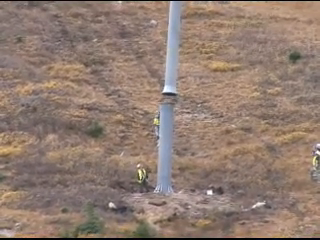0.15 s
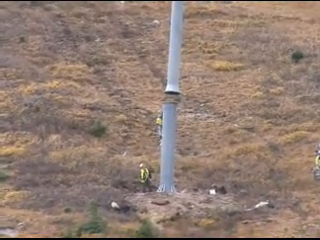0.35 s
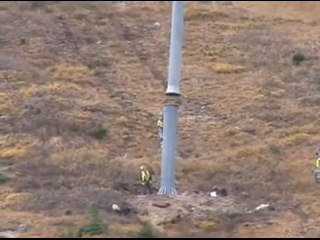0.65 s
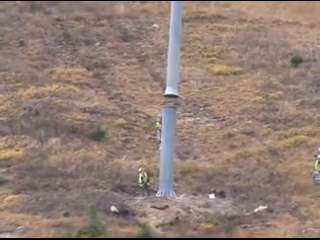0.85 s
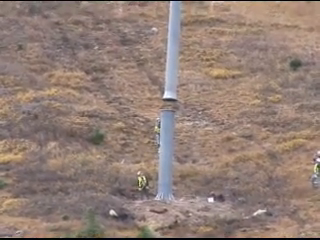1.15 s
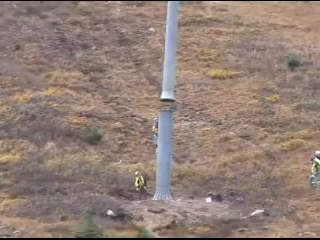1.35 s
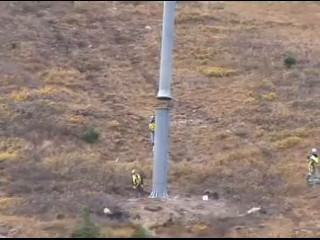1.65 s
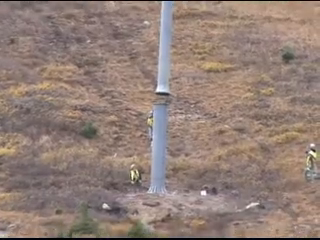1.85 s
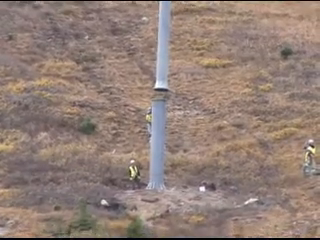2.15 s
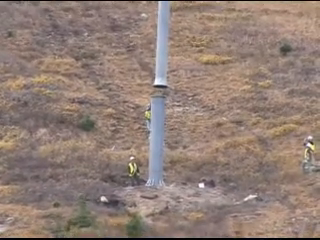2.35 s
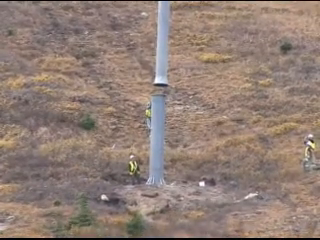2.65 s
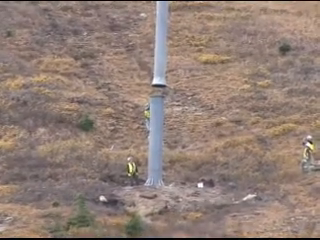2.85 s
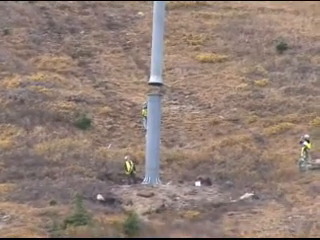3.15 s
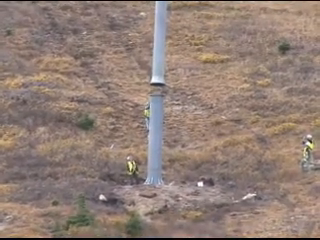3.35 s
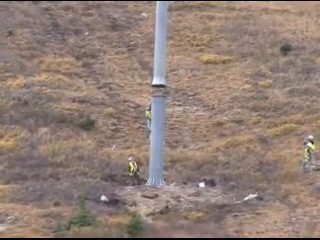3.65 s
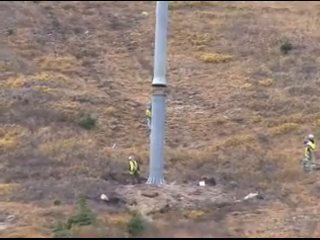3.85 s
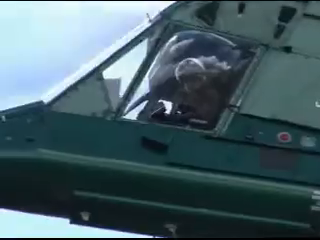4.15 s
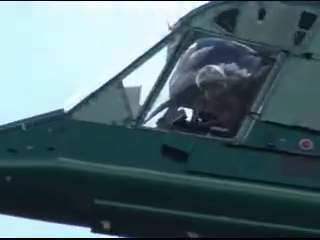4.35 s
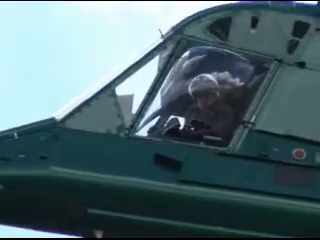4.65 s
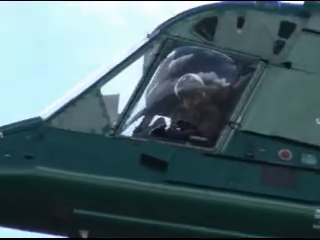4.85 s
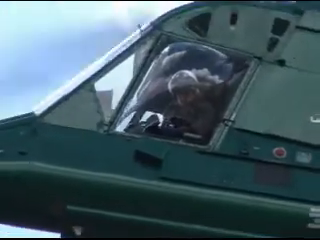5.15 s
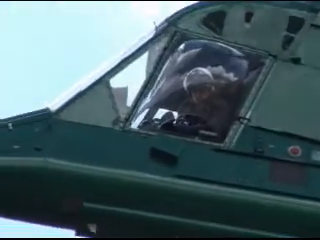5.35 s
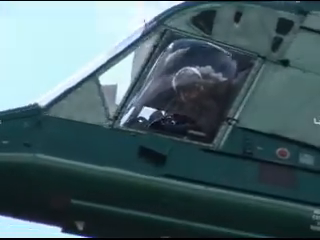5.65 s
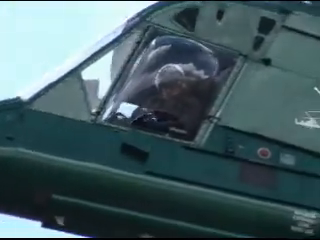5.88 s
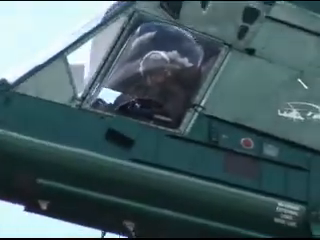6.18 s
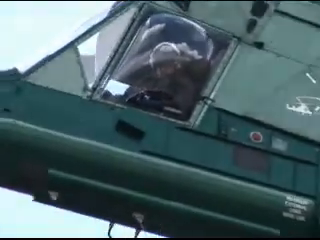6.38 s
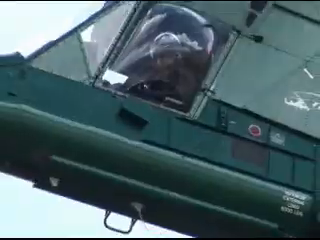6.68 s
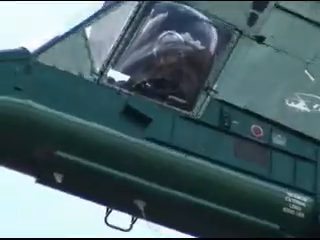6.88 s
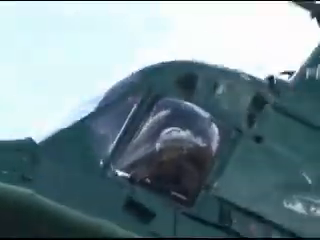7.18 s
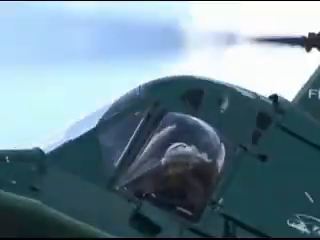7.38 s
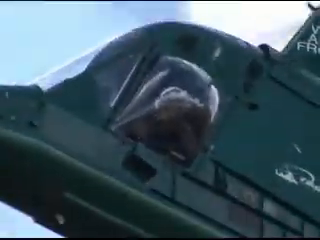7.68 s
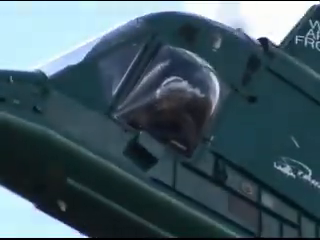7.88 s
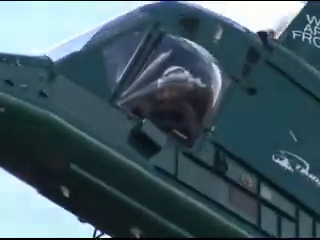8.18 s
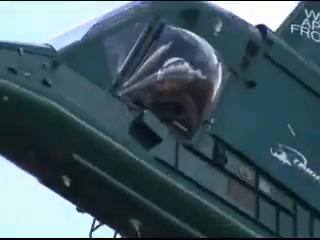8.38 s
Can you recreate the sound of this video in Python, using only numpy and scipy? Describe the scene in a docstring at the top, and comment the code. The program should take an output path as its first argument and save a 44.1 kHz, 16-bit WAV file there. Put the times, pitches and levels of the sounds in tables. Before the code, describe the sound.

Rapid chopping of a heavy hovering helicopter, deep and reverberant at a distance, cuts suddenly to a crisper, hissing close-up with whistling blades and singing gears.

```python
"""A hillside: a twin-rotor helicopter hovers with a load, heard from a distance, then abruptly from close by.
Behind it lie turbine hiss, gear and turbine whine, a drone and a throbbing boom, made of coloured noise and
wavering tones. Swish and downwash are noise that swells with the rotors. In front, blades slap about nine times
a second, as filtered pulses; from afar the second rotor and ground answer, and at both places the slope scatters."""
import sys
import numpy as np
from scipy import signal
from scipy.fft import rfft, irfft, next_fast_len
from scipy.io import wavfile
from scipy.ndimage import uniform_filter1d

SR = 44100
rng = np.random.default_rng(int(sys.argv[2]) if len(sys.argv) > 2 else 0)


def generate_wav(sig):
    """Save sig (samples, or channels by samples) to the path in sys.argv[1] as 16-bit PCM at SR."""
    pcm = np.round(np.clip(np.atleast_2d(sig).T, -1, 1) * 32767).astype(np.int16)
    wavfile.write(sys.argv[1], SR, pcm)


N = 375732
T = np.arange(N) / SR  # time of each sample [s]

CUT_S = 4.127  # the listening place moves from far to close [s]
TOP_HZ = 10400  # upper edge of the microphone chain [Hz]

# Levels below are relative, before later mixing and scaling, unless a line says otherwise.
# Spectra are filter responses: (frequency [Hz], level [dB])
# turbine hiss, far and close
FAR_HISS = [(150, -3), (700, -4), (1030, 0), (1260, 8.5), (1500, -3.5), (1780, 6), (2050, -1.5),
            (2400, 3.5), (3000, -3), (3900, -16.5), (4600, -30.5), (5050, -29), (5700, -58.5),
            (10000, -52.5)]
NEAR_HISS = [(150, 5), (850, -1.5), (1200, 2), (1480, -5), (1800, 2), (2700, -0.5), (4000, -9.5),
             (4620, -22.5), (5020, -14), (5500, -22.5), (5950, -21.5), (7500, -44), (8500, -23),
             (10200, -30.5)]
# rotor downwash, far and close
FAR_WASH = [(15, -28.5), (50, -9.5), (100, 0), (230, -2.5), (450, -3.5), (800, -8), (1050, -19),
            (1500, -26), (4000, -68)]
NEAR_WASH = [(15, -10), (50, -6.5), (85, 4.5), (125, -6.5), (165, -6.5), (205, 1.5), (260, -3.5), (400, -5),
             (700, -18.5), (3000, -63.5)]
# blade swish, close
NEAR_SWISH = [(1000, -33.5), (1900, -4), (2400, 5.5), (3000, 6), (4000, -3), (4620, -18), (5020, -9),
              (5500, -23), (6000, -24), (7500, -28.5), (8500, -42.5), (10200, -48)]
# narrow band of turbine roar, far
TURBINE_BAND = [(700, -51.5), (1150, -6), (1270, 2.5), (1360, -4.5), (1480, -32), (3000, -71)]
# lumpy body of air around each close slap
CHUFF_BAND = [(100, -29), (190, -6.5), (255, 6), (330, -7.5), (470, -5), (650, -23), (870, -12),
              (2500, -48)]
# crack of the torn vortex at each slap, far and close
FAR_CRACK = [(300, 7), (900, 9.5), (1280, 11.5), (1500, -5.5), (2400, -3.5), (3200, -11), (4500, -27),
             (5100, -43.5), (6000, -57), (9000, -53)]
NEAR_CRACK = [(150, -8), (400, 2), (850, 5.5), (1500, -1), (2500, -6), (3500, -4), (4600, -16), (5100, -12),
              (7000, -38), (10000, -30)]
# bright snap of the hardest slaps
SNAP = [(300, -5.5), (900, 5.5), (1500, 5.5), (1900, 16.5), (2600, 8), (3300, 4), (4500, -25),
        (6000, -44.5), (9000, -48.5)]
# slap with its answers from the hillside, far and close
FAR_SLAP = [(12, -39.5), (27, -3.5), (50, -8), (105, -0.5), (175, 2), (230, 5), (300, -1), (470, -1.5),
            (650, -8.5), (850, -9.5), (1250, -20.5), (1500, -33), (2400, -23.5), (3300, -37.5),
            (4600, -55.5), (7000, -78)]
NEAR_SLAP = [(12, -25), (27, -18), (50, -2.5), (85, 3), (125, 2.5), (160, 4.5), (205, -1.5), (270, 0),
             (450, -11), (800, -32.5), (1500, -27), (2600, -23.5), (4600, -61), (8000, -63)]

# level of the far turbine roar: (time [s], level [dB])
TURBINE_LEVEL = [(0, -39.5), (.28, -35.5), (.6, -44), (2.6, -57), (3.1, -38), (3.4, -51.5), (4.05, -43)]
# gear and turbine tones: (frequency [Hz], level [dB])
FAR_WHINE = [(1260, -55.5), (1783, -48.5)]
FAR_HUM = [(183, -38), (316, -39)]
NEAR_WHINE = [(1949, -5.5), (3068, -18)]
NEAR_HUM = [(160.5, 0)]
# level of the low hum close by: (time [s], level [dB])
NEAR_HUM_LEVEL = [(4.18, -36), (4.45, -53), (5.8, -34), (6.2, -49), (6.9, -38.5), (7.4, -46), (8.3, -39)]
# gear whine beaming out as the fuselage turns: (time [s], level [dB])
GEAR_LEVEL = [(4.2, -55), (5.4, -56), (5.7, -43), (5.88, -43), (6.3, -35), (6.46, -45), (6.62, -34.5),
              (6.82, -37), (7.05, -43), (7.55, -52), (7.8, -41), (8.5, -46)]
# share by which the gear pitch sags each second [1/s], and when it is true [s]
GEAR_SAG_PER_S, GEAR_TRUE_S = .002, 6.6
# the faint peep: middle [s], half length [s], pitch fall over a half length [Hz]
PEEP_S, PEEP_HALF_S, PEEP_ARCH_HZ = 1.6, .045, 140.6
# its tones at the top of the arch: (frequency [Hz], level [dB])
PEEP_TONES = [(4290, -68), (5100, -65)]
# held low drone from afar: (time [s], pitch [Hz], level [dB])
DRONE = [(.2, 87.7, -40), (.6, 90.53, -34), (.85, 97.33, -25), (1.3, 97.4, -26), (1.52, 94.8, -49),
         (1.68, 88.6, -30.5), (2.15, 93.5, -31.5), (2.5, 92, -48.5)]
# throbbing boom from afar: (time [s], centre [Hz], level [dB])
BOOM = [(.45, 170, -33.5), (.7, 175, -23.5), (.88, 128, -24), (1.3, 122, -28.5), (1.55, 125, -41),
        (2.7, 160, -37.5), (3.25, 142, -29), (3.75, 164, -26.5), (4.08, 165, -29)]
# air around each close slap: (time [s], lag behind the slap [s], level [dB])
CHUFF = [(5, 0.011, -37.5), (5.6, 0.014, -45.5), (6.4, 0, -38), (7.2, .002, -38), (7.8, 0, -34),
         (8.45, 0.0053, -38)]
# turn of the aircraft: (time [s], lag of the tip whistle [beats], whistle level [dB])
SWISH_TURN = [(4.2, 0, -45), (4.6, -.07, -37), (5.12, -0.061, -40), (5.4, 0.005, -48), (6.6, 0, -42),
              (7.35, 0.077, -41.5), (7.53, .06, -51), (7.72, .14, -42), (8.14, .2, -37.5), (8.45, .1, -42)]
TIP_HZ = 2620  # middle pitch of the whistle as a blade tip passes [Hz]

# governed rotor beat: (a blade passage before the sway delay [s], rate [blades/s],
# sway along the line of sight [m], time when farthest [s])
FAR_ROTOR = (.0718, 9.1194, .55, .8)
NEAR_ROTOR = (4.2359, 9.0264, .36, 6.1)
SWAY_PERIOD_S, SOUND_M_S = 3.65, 343  # sway period [s], speed of sound [m/s]
# scatter from the slope, far: (time [s], quick clatter [dB], late rumble [dB])
FAR_SLOPE = [(.1, -8.5, -2), (.6, -13, 9), (1.3, -8, 9.5), (1.6, -2.5, 1), (2.05, -12, -1.5),
             (2.4, -1.5, -5), (3.05, -0.5, -3), (3.45, -1.5, -11), (4.05, -13.5, -7)]
# far hillside thump: (time [s], lag [s], spacing of its three pulses [s], level [dB])
GROUND_THUMP = [(.07, .0432, .003, -3.5), (.65, .0422, 0.0032, 5), (.95, 0.038, .0045, -1),
                (1.39, .042, .0047, -9), (1.75, .042, 0.0053, -5.5), (2.37, .0385, .0023, -3.5),
                (3.14, .0418, .0034, 0), (3.72, .043, 0.0026, 1)]
# pressures of those three pulses, suction negative: (pressure [relative])
THUMP_SHAPE = [-0.54, 0.99, -0.51]
# bright echo late in the beat, far: (time [s], lag [s], level [dB])
FAR_ECHO = [(2.6, .079, -8), (3.7, .079, -6.5), (4.021, .079, -14)]
# two wandering echoes, close: (time [s], lag [s], level [dB])
BRIGHT_ECHO = [(4.2, 0.061, -4), (5.3, 0.058, -9), (6.2, 0.093, -8), (7.4, 0.077, -21), (7.8, 0.051, -11),
               (8.1, 0.061, -3.5), (8.45, 0.059, -5)]
DULL_ECHO = [(4.2, 0.075, -20), (5.1, 0.071, -19), (5.56, 0.079, -3.5), (6.3, 0.082, -8.5),
             (7.1, .082, -10), (8.45, 0.1, 4)]
# later arrivals of each close slap: (lag [s], pressure [relative], treble edge [Hz])
NEAR_ARRIVALS = [(.0016, -0.7, 600), (.0062, 0.46, 400), (0.0115, .5, 330)]
# second rotor's slap, far: (time [s], lag behind the first [s], level [dB])
SECOND_ROTOR = [(.07, 0.029, 1.5), (.32, 0.032, 2.5), (1.1, 0.03, -0.5), (1.6, 0.03, -1), (2.4, 0.03, -4),
                (3.55, 0.03, -6.5), (4.02, 0.037, -8)]
# how hard the blades bite into the tip vortices: (time [s], strength [dB])
FAR_BITE = [(0.07, 1), (1.17, -0.5), (1.3, -5), (1.55, 1), (2.15, -1.5), (2.88, -1.5), (3.1, 3),
            (3.6, -2.5), (4.02, -1)]
NEAR_BITE = [(4.24, 3), (4.46, -0.5), (4.79, 3), (5.46, -2.5), (7.34, -2), (7.78, -1), (8.1, -1.5),
             (8.45, -1)]
# slaps that stand out: (time [s], extra strength [dB], level of the bright snap [dB])
HARD_SLAPS = [(0.073, 0, -28), (.104, 2.5, -28), (.182, 1.5, -26.5), (.214, 1.5, -29.5), (.291, 1.5, -37),
              (.621, -1, -35), (.731, -0.5, -34), (0.872, 3.5, -35), (1.497, 3, -20), (1.637, 3.5, -27),
              (1.715, 0.5, -28.5), (1.823, -1.5, -31), (1.965, 4, -28), (2.074, -0.5, -34), (2.262, 1, -28),
              (2.372, 1.5, -28), (2.404, 2.5, -27), (2.591, 3, -27), (2.622, 1.5, -32), (3.030, -3, -22.5),
              (3.249, 1, -28), (3.359, 1, -30), (3.390, 3.5, -26), (3.691, 4.5, -28), (3.769, 1.5, -32.5),
              (3.801, 2.5, -28), (3.912, 1.5, -30.5), (3.942, 5, -25.5), (4.021, -1.5, -21.5),
              (4.790, -1, -19), (4.900, -1, -26), (5.011, -0.5, -24), (5.678, -1, -23), (8.064, 0, -26),
              (8.174, 2, -34)]
# level of the deep thud: (time [s], level [dB])
FAR_THUD = [(0.11, -21.5), (1.2, -23), (1.8, -23.5), (2.6, -22.5), (3.1, -19.5), (4.06, -23.5)]
NEAR_THUD = [(4.29, -33.5), (4.62, -33.5), (5.73, -32), (6.6, -31.5), (7.5, -35), (8.39, -37)]
# a harder bite also sharpens the slap: extra dB of its upper part per dB of bite
FAR_SHARPEN, NEAR_SHARPEN = .15, .8
# base levels of the slap's upper part and of the hiss [dB]
FAR_SLAP_DB, FAR_HISS_DB = -24, -37
NEAR_SLAP_DB, NEAR_HISS_DB = -33.5, -31.5
HISS_EBB_DB_PER_S = 0.27  # the close hiss ebbs as the aircraft turns away


def undb(db):
    """Decibels to gain."""
    return 10 ** (np.asarray(db) / 20)


def curves(table):
    """The columns of a table of timed rows, one value a sample."""
    s, *columns = np.transpose(table)
    return [np.interp(T, s, c) for c in columns]


def at_beats(table, beats):
    """The columns of a table of timed rows, one value a beat."""
    return [np.interp(beats, T, c) for c in curves(table)]


def unit(x):
    """Scale to rms 1."""
    return x / np.sqrt(np.mean(x ** 2))


def pulse_wave(phase, peak):
    """A cosine swell once a beat, highest at the given share of the beat."""
    return np.cos(2 * np.pi * (phase - peak))


def tone(hz):
    """A sine that follows a moving pitch."""
    return np.sin(2 * np.pi * np.cumsum(hz) / SR)


def colour(x, spectrum, size=8192):
    """Causal minimum-phase filter with the given (Hz, dB) response."""
    hz, db = np.transpose(spectrum)
    grid = np.maximum(np.fft.rfftfreq(size, 1 / SR), 1)
    response_db = np.interp(np.log(grid), np.log(hz), db)
    cepstrum = irfft(np.log(undb(response_db)))
    # folding the cepstrum forward puts the energy as early as possible
    cepstrum[1:size // 2] *= 2
    cepstrum[size // 2 + 1:] = 0
    impulse = irfft(np.exp(rfft(cepstrum)))
    return signal.fftconvolve(x, impulse)[:N]


def blur(x, edge_hz):
    """Rough ground and air smear a pulse in time and take its treble."""
    size = next_fast_len(N, True)
    hz = np.fft.rfftfreq(size, 1 / SR)
    return irfft(rfft(x, size) / (1 + (hz / edge_hz) ** 2), size)[:N]


def noise(spectrum):
    """Coloured noise of rms 1."""
    return unit(colour(rng.standard_normal(N), spectrum))


def walk(rate):
    """Slow chance of rms 1, with the given number of knots a second."""
    knots = rng.standard_normal(1024)
    return unit(np.interp(T * rate, np.arange(len(knots)), knots))


def clicks(times, sizes):
    """Impulses at the given moments."""
    inside = (times >= 0) & (times < T[-1])
    return np.bincount((times[inside] * SR).astype(int), sizes[inside], N)


def crackle(pulses, decay_s):
    """Noise that dies away after each pulse, as torn air does."""
    return signal.lfilter([1], [1, -np.exp(-1 / (decay_s * SR))], pulses) * rng.standard_normal(N)


def whine(lines, wander, flicker_db, glide=1):
    """Gear and turbine tones, shaken by the moving air."""
    out = 0
    for hz, db in lines:
        shaken = tone(hz * glide * (1 + wander * walk(30)))
        out = out + undb(db) * unit(shaken * undb(flicker_db * walk(15)))
    return out


def gears():
    """The gear whine beams out and fades as the fuselage turns, and sags a little in pitch."""
    glide = 1 - GEAR_SAG_PER_S * (T - GEAR_TRUE_S)
    return whine(NEAR_WHINE, wander=.0006, flicker_db=1.7, glide=glide) * undb(curves(GEAR_LEVEL)[0])


def peep():
    """A thin two-toned whistle that arches in pitch and level."""
    arch = np.minimum(((T - PEEP_S) / PEEP_HALF_S) ** 2, 20)
    tones = sum(undb(db) * unit(tone(hz - PEEP_ARCH_HZ * arch)) for hz, db in PEEP_TONES)
    return tones * np.exp(-arch)


def drone(phase, throb_db):
    """A low held tone that throbs a little with the beat."""
    hz, db = curves(DRONE)
    return unit(tone(hz) * undb(throb_db * pulse_wave(phase, .4))) * undb(db)


def boom(phase, wander, throb_db, peak, flicker_db):
    """A narrow low resonance of wandering pitch that swells once a beat, after the slap."""
    hz, db = curves(BOOM)
    resonance = tone(hz * (1 + wander * walk(60)))
    swell_db = throb_db * pulse_wave(phase, peak) + flicker_db * walk(25)
    return unit(resonance * undb(swell_db)) * undb(db)


def swish(phase, spectrum, depth_db, peak, flutter_db):
    """Turbulent air swells as a blade advances; peak is a share of a beat."""
    swell_db = depth_db * pulse_wave(phase, peak) + flutter_db * walk(40)
    return noise(spectrum) * unit(undb(swell_db))


def chuff(phase, length_s, flutter_db):
    """Churned air swells and fades around each close slap."""
    lag_s, db = curves(CHUFF)
    since_s = ((phase + .5) % 1 - .5) / NEAR_ROTOR[1] - lag_s
    swell = np.exp(-(since_s / length_s) ** 2)
    return unit(noise(CHUFF_BAND) * swell * undb(flutter_db * walk(30))) * undb(db)


def tip_whistle(phase, doppler, length, width_hz, wander, uneven_db):
    """Vortices shed at the blade tip sing with a rough pitch that falls as the blade sweeps by."""
    passing = (phase + .5) % 1 - .5  # beats from the passage
    sweep = 1 - doppler * np.sin(2 * np.pi * passing) + wander * walk(9)
    song = tone(TIP_HZ * sweep + width_hz * walk(115)) * undb(3 * walk(100))
    return unit(song * np.exp(-(passing / length) ** 2) * undb(uneven_db * walk(7.2)))


def rotor(first_s, rate, sway_m, farthest_s):
    """Blade passages [s] and the share of the beat gone by at each sample; the sway delays the even beat."""
    delay = sway_m / SOUND_M_S * np.cos(2 * np.pi * (T - farthest_s) / SWAY_PERIOD_S)
    turns = rate * (T - first_s - delay)
    beats = np.interp(np.arange(np.ceil(turns[0]), turns[-1]), turns, T)
    # one passage before the start, so that its echoes are heard
    return np.r_[2 * beats[0] - beats[1], beats], turns % 1


def hardness(times):
    """Extra dB for those slaps that are among the hard ones."""
    s, extra_db, _ = np.transpose(HARD_SLAPS)
    return (np.abs(times[:, None] - s) < .01) @ extra_db


def chance(beats, spread_db):
    """An independent random level in dB for each beat."""
    return spread_db * rng.standard_normal(len(beats))


def bite(beats, uneven_db):
    """Strength of each slap as a blade bites into a tip vortex."""
    db = np.interp(beats, *np.vstack([FAR_BITE, NEAR_BITE]).T)
    return undb(db + hardness(beats) + chance(beats, uneven_db))


def slope(beats, peak_s, drift_s, count=120):
    """Ground patches return each slap, strongest near peak_s; paths and strengths drift slowly by chance."""
    lags = (np.arange(count) + rng.random(count)) / count * .16
    # chance smoothed from slap to slap
    drift = rng.standard_normal((2, len(beats), count))
    drift = uniform_filter1d(drift, size=11, axis=1, mode="wrap")
    gains = drift[0] * lags * np.exp(-lags / peak_s)
    gains /= np.sqrt(np.sum(gains ** 2, axis=1, keepdims=True))
    return clicks(beats[:, None] + lags + drift_s * unit(drift[1]), gains)


def ground(beats, edge_hz, uneven_db):
    """The hillside returns suction, pressure, suction; the wider their spacing, the deeper the thump."""
    lag_s, spacing_s, db = at_beats(GROUND_THUMP, beats)
    out = 0
    for place, pressure in enumerate(THUMP_SHAPE):
        times = beats + lag_s + (place - 1) * spacing_s
        out = out + clicks(times, pressure * undb(db + chance(beats, uneven_db)))
    return blur(out, edge_hz)


def arrival(beats, path, edge_hz, uneven_db):
    """A pulse follows each beat along a path of changing length and strength."""
    lag_s, db = at_beats(path, beats)
    late = beats + lag_s
    return blur(clicks(late, undb(db + hardness(late) + chance(beats, uneven_db))), edge_hz)


def crack(beats, spectrum, decay_s, uneven_db):
    """The torn vortex crackles for a few milliseconds or more at each slap."""
    return unit(colour(crackle(clicks(beats, bite(beats, uneven_db)), decay_s), spectrum))


def snaps(decay_s):
    """The hardest slaps tear the vortex with a bright snap."""
    s, _, db = np.transpose(HARD_SLAPS)
    return colour(crackle(clicks(s, undb(db)), decay_s), SNAP)


def tilt(x, thud_db, slap_db, split_hz):
    """The deep thud and the sharper slap swell separately as the rotor discs tilt."""
    low = signal.sosfiltfilt(signal.butter(2, split_hz, fs=SR, output="sos"), x)
    return low * undb(thud_db) + (x - low) * undb(slap_db)


def far_slaps(beats):
    """Both rotors slap; the hillside answers with a thump, scatter, a quick clatter and a late rumble."""
    pulses = clicks(beats, bite(beats, 0.29))
    pulses = pulses + arrival(beats, SECOND_ROTOR, edge_hz=1200, uneven_db=1.5)
    pulses = pulses + arrival(beats, FAR_ECHO, edge_hz=2200, uneven_db=2.5)
    thump = ground(beats, edge_hz=350, uneven_db=3.0)
    clatter_db, rumble_db = curves(FAR_SLOPE)
    scatter = undb(5.5) * blur(slope(beats, 0.034, 0.00044), 740)
    clatter = undb(clatter_db) * blur(slope(beats, 0.0073, 0.00047), 1500)
    rumble = undb(rumble_db) * blur(slope(beats, 0.14, .0006), 220)
    return unit(colour(pulses + thump + scatter + clatter + rumble, FAR_SLAP))


def near_slaps(beats, uneven_db, slope_db, slope_hz, peak_s, drift_s):
    """Each blade strikes a tip vortex: a sharp pressure pulse, later arrivals, echoes and slope scatter."""
    pulses = clicks(beats, bite(beats, uneven_db / 2))
    for lag, pressure, edge_hz in NEAR_ARRIVALS:
        # each lag wanders slowly by chance
        late = beats + lag * (1 + .06 * np.interp(beats, T, walk(1.5)))
        pulses = pulses + blur(clicks(late, pressure * undb(chance(beats, uneven_db))), edge_hz)
    echoes = arrival(beats, BRIGHT_ECHO, edge_hz=1100, uneven_db=2.0)
    echoes = echoes + arrival(beats, DULL_ECHO, edge_hz=510, uneven_db=4.5)
    scatter = blur(slope(beats, peak_s, drift_s), slope_hz)
    return unit(colour(pulses + echoes + undb(slope_db) * scatter, NEAR_SLAP))


def far():
    """From a distance: heavy double slaps, a loud slope, a throbbing boom, little treble."""
    beats, phase = rotor(*FAR_ROTOR)
    engine = noise(TURBINE_BAND) * undb(curves(TURBINE_LEVEL)[0])
    engine = engine + whine(FAR_HUM, wander=0.0058, flicker_db=2.5)
    engine = engine + whine(FAR_WHINE, wander=.005, flicker_db=1.5)
    throb = drone(phase, throb_db=0.5)
    throb = throb + boom(phase, wander=0.0924, throb_db=3.5, peak=0.36, flicker_db=2.0)

    hiss = swish(phase, FAR_HISS, depth_db=1.7, peak=0.34, flutter_db=1.3)
    lag_s, second_db = curves(SECOND_ROTOR)
    second_beats = beats + np.interp(beats, T, lag_s)
    first = crack(beats, FAR_CRACK, decay_s=.0045, uneven_db=1)
    second = crack(second_beats, FAR_CRACK, decay_s=0.004, uneven_db=1.5) * undb(second_db)
    # the longer fizz follows the level of the slope's clatter
    fizz = crack(beats + 0.011, FAR_CRACK, decay_s=0.017, uneven_db=2.5)
    fizz = fizz * undb(curves(FAR_SLOPE)[0] - 3)
    air = undb(1.8) * hiss + undb(-5.5) * first + undb(-6) * second + fizz

    wash = swish(phase, FAR_WASH, depth_db=2, peak=0.48, flutter_db=2.0)
    slap_db = FAR_SLAP_DB + FAR_SHARPEN * curves(FAR_BITE)[0]
    chop = undb(2.55) * far_slaps(beats) + undb(-3.0) * wash
    beat = tilt(chop, curves(FAR_THUD)[0], slap_db, split_hz=200)
    return engine + throb + undb(FAR_HISS_DB) * air + beat


def near():
    """Close by: one sharp slap a beat inside a bright swish, with the gears singing."""
    beats, phase = rotor(*NEAR_ROTOR)
    hum = whine(NEAR_HUM, wander=0.0144, flicker_db=4.0) * undb(curves(NEAR_HUM_LEVEL)[0])

    hiss = swish(phase, NEAR_HISS, depth_db=0.0, peak=.03, flutter_db=1.07)
    slide, tip_db = curves(SWISH_TURN)
    # the swish slides through the beat half as far as the tip whistle
    blade = swish(phase - .5 * slide, NEAR_SWISH, depth_db=5.5, peak=.02, flutter_db=2.8)
    torn = crack(beats, NEAR_CRACK, decay_s=0.0095, uneven_db=0.5)
    air = undb(-1.0) * hiss + undb(-5.0) * blade + undb(-9.5) * torn
    hiss_db = NEAR_HISS_DB - HISS_EBB_DB_PER_S * (T - CUT_S)
    tip = tip_whistle(phase - slide, doppler=.16, length=.23, width_hz=65, wander=.015, uneven_db=1)
    body = chuff(phase, length_s=0.018, flutter_db=1.5)

    wash = swish(phase, NEAR_WASH, depth_db=7.0, peak=0.65, flutter_db=-3.5)
    slaps = near_slaps(beats, uneven_db=-2.5, slope_db=0.5, slope_hz=600, peak_s=0.071, drift_s=0.00045)
    slap_db = NEAR_SLAP_DB + NEAR_SHARPEN * curves(NEAR_BITE)[0]
    chop = undb(3.5) * slaps + undb(-3.5) * wash
    beat = tilt(chop, curves(NEAR_THUD)[0], slap_db, split_hz=310)
    return hum + gears() + undb(hiss_db) * air + undb(tip_db) * tip + body + beat


def scene():
    """The distant position gives way abruptly to the close one."""
    close = np.clip((T - CUT_S) / .002, 0, 1)
    distant = far() + peep()
    return (distant * (1 - close) + near() * close + snaps(decay_s=0.0029))[None]


def record(dry):
    """The microphone chain cuts the top with a steep low-pass."""
    return signal.sosfilt(signal.ellip(10, .2, 80, TOP_HZ, fs=SR, output="sos"), dry)


dry = scene()
out = record(dry)
generate_wav(out)
```